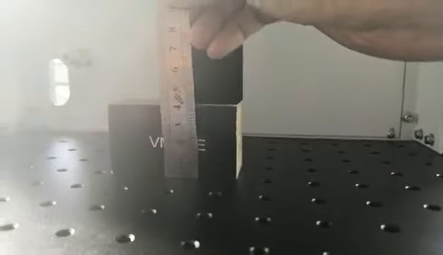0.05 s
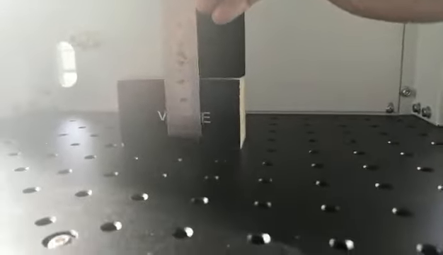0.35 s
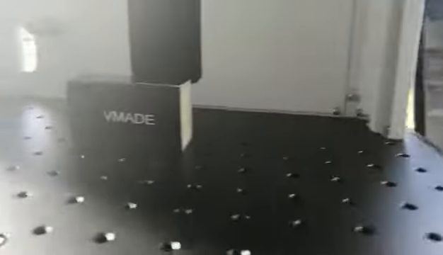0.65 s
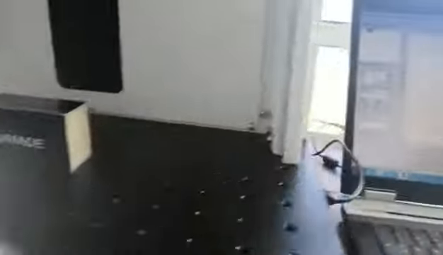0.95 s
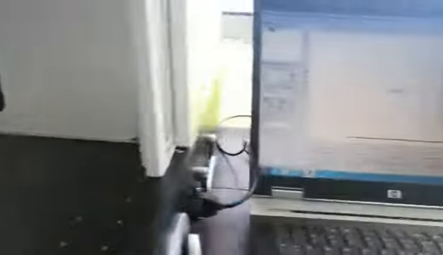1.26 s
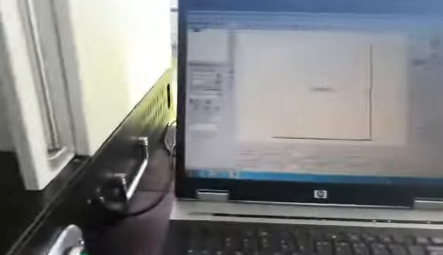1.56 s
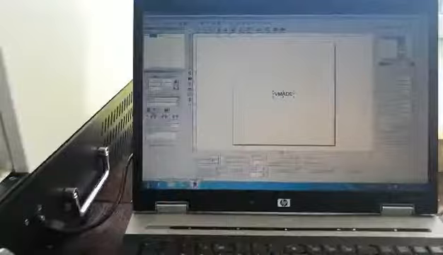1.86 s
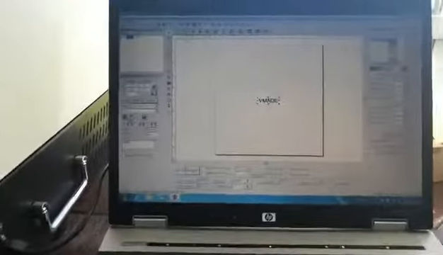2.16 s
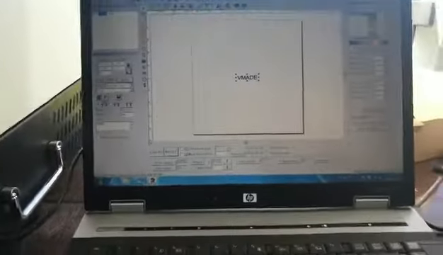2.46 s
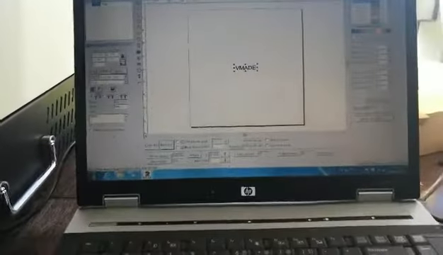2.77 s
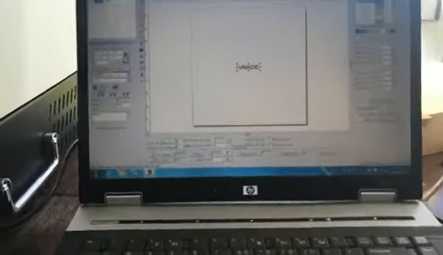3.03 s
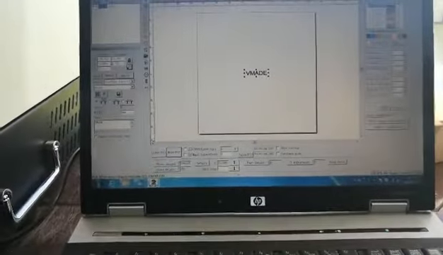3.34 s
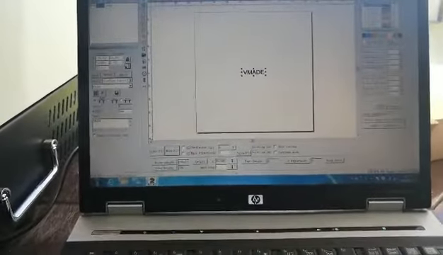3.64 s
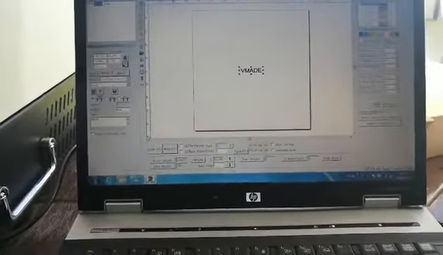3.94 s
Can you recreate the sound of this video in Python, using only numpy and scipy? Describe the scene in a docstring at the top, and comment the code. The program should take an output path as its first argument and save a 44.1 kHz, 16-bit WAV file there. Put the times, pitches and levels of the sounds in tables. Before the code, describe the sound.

A steel ruler and a block clack and scrape on a metal worktable, close by in a small workshop. Two light slides lead to a few sharp knocks, leaving only soft fan hiss and low machine hum.

```python
"""Ruler and block on a metal worktable

A steel ruler and a block are slid and knocked about in a small workshop. Friction makes two scrapes;
impacts excite the modes of table, ruler and block, and two dull knocks and some bright clacks ring
into the room. A fan hisses and a machine cabinet hums, less as the microphone turns away from it."""
import sys
import numpy as np
from scipy import signal
from scipy.fft import rfft, irfft
from scipy.io import wavfile
from scipy.ndimage import uniform_filter1d

SR = 44100
rng = np.random.default_rng(int(sys.argv[2]) if len(sys.argv) > 2 else 0)


def to_wav(sig):
    """Store sig (one row per channel, or 1-D mono) as 16-bit WAV at the path in sys.argv[1].

    Samples outside -1..1 are clipped; the rate is SR.
    """
    pcm = np.clip(np.atleast_2d(sig), -1, 1) * 32767
    pcm = np.round(pcm).astype(np.int16)
    wavfile.write(sys.argv[1], SR, pcm.T)  # frames by channels


N = 176400
T = np.arange(N) / SR
TURN_S = (0.91, 1.97)  # start and end of the microphone's turn away from the cabinet

# modes of the block: f/Hz, level/dB, T60/s
BLOCK_MODES = [(1071, -10, .22), (1416, -10, .24), (1562, -7, .4), (1735, -1, .24), (1764, -1, .35),
               (1827, -3, .22), (2083, -8, .24), (2226, -2, .2), (2266, -3, .28), (2338, -2, .24),
               (2558, -7, .3), (2880, -2, .12), (3015, -7, .17)]
# coherence between the channels for hiss and friction: f/Hz, correlation
COHERENCE = [(240, 0.54), (490, -0.82), (990, 0.43), (2000, -0.028), (6000, -0.014)]


def impacts():
    """Direct and reverberant sound: each blow is heard close by, and the table's crack excites the room."""
    # blows: t/s, level/dB, attack/s, T60/s, left-right/dB, room/dB, ruler/dB, block/dB,
    # then the crack's gain/dB in each of six bands
    blows = [(0.4341, -35.5, 0.001, 0.05, 6, 2.5, -27, -12, 7, 4.5, 2, -9, -10, -16),
             (0.4682, -21.5, 0.0047, 0.024, 4.5, 1, -20, -22, -1, -14.5, 0, -2.5, -1.5, 5),
             (0.4769, -27.5, 0.00092, 0.091, 6.5, -4, -8, -10, 10, 2, 1.5, 0.5, 3, -10),
             (0.4849, -30.5, 0.001, 0.05, 6, -1.5, -8, -16, 8, -2.5, 8, 4.5, 6.5, -9.5),
             (1.1017, -21.5, 0.00075, 0.022, 0.5, -9, -28, -6.5, -8.5, 3.5, 1, -11.5, -6, -1),
             (1.1643, -9.5, 0.001, 0.018, -1.5, -8.5, -30, -12.5, -3, -4.5, 4, -10.5, -2.5, -10),
             (1.3340, -11, 0.0016, 0.026, 1.5, -5.5, -22, -10.5, -10, -3.5, 1.5, -2.5, -4.5, 12.5),
             (1.3740, -21, 0.00055, 0.022, 4.5, 2, 1, -8, -0.5, -5, 2, 2, 4, 1.5),
             (1.3795, -25, 0.0005, 0.024, 2, -4, 7, -4, 0, -4, 2, 4, -1, -5) ]
    direct, echo = np.zeros((2, 2, N))
    for start, db, attack_s, t60, left_db, room_db, ruler_db, block_db, *bands_db in blows:
        crack = table_crack(attack_s, t60, bands_db)
        ring = ruler_and_block(attack_s, ruler_db, block_db)
        add(direct, start, amp(db) * (crack + ring) * pan(left_db))
        add(echo, start, amp(db + room_db) * reverberation(crack))
    return direct, echo


def table_crack(attack_s, t60, bands_db, contact_s=.0012):
    """Modal overlap: the table's dense, quickly damped modes merge into a burst of shaped noise."""
    # response of the table to any blow: f/Hz, level/dB
    response = [(60, -35.5), (200, -35.5), (450, -7.5), (750, -1), (1100, 6), (1400, 0.5), (1750, 3.5),
                (2800, 2.5), (3200, 2.5), (3700, 5.5), (4400, -2), (5300, 1), (7200, 1.5), (7700, -9),
                (8300, -23), (8800, -36)]
    # centres of the six bands: f/Hz
    band_hz = [550, 1120, 2150, 3430, 6050, 7100]
    t, f = np.arange(SR // 2) / SR, np.fft.rfftfreq(2048, 1 / SR)
    rise = np.minimum(t / attack_s, 1)
    envelope = rise * amp(-60 * np.maximum(t - attack_s - contact_s, 0) / t60)
    grain = rng.standard_normal((2, len(t)))
    spectrum = rfft((grain + 0.16 * grain[::-1]) * envelope)  # the channels share a little noise
    local_rms = np.sqrt(uniform_filter1d(abs(spectrum) ** 2, size=400, axis=1))
    white_burst = irfft(spectrum / local_rms, len(t)) * np.linalg.norm(envelope)
    gain_db = curve(response, f) + curve(list(zip(band_hz, bands_db)), f)
    return amp(3) * minimum_phase(white_burst * (t < t[-1] / 2), gain_db)[:, :len(t)]


def ruler_and_block(attack_s, ruler_db, block_db):
    """Free vibration: the struck ruler and block ring on at their natural frequencies."""
    # modes of the steel ruler: f/Hz, level/dB, T60/s
    ruler_modes = [(3416, 0, .07), (3582, 2, .06), (3655, 1, .055), (3723, 1, .06), (3887, 1, .08),
                   (4032, 2, .085), (4108, -6, .12), (6780, -12, .27), (6979, -12, .26), (7111, -14, .25),
                   (7396, -14, .25)]
    t = np.arange(SR // 2) / SR
    ring = amp(ruler_db) * ringing(ruler_modes, t) + amp(block_db) * ringing(BLOCK_MODES, t)
    return amp(-7) * ring * np.minimum(t / attack_s, 1)


def ringing(modes, t):
    """Modal superposition: damped sines add, each with a random phase in each channel."""
    return sum(amp(db - 60 * t / t60) * np.sin(2 * np.pi * (hz * t + rng.random((2, 1))))
               for hz, db, t60 in modes)


def scrapes(dull_db=-17):
    """Friction drives the block's modes and a table rumble; the sound swells and brightens with speed."""
    # slides: start t/s, fastest t/s, end t/s, level/dB, left-right/dB, treble/dB, body/dB
    slides = [(-.2, 0.092, 0.42, -40.5, 1.5, 5, 3), (.46, 0.63, 1.04, -31.7, 2.5, 1, -3.5)]
    # spectrum of the friction: f/Hz, density level/dB
    friction_spectrum = [(240, -41.5), (400, -1.5), (447, -8), (630, -3), (888, -10), (1020, 0), (1400, -4),
                         (1810, 1), (2640, -1), (3820, -7), (4270, -9), (6720, -15), (7500, -24),
                         (9750, -48), (16500, -120)]
    # spectrum of the table's rumble: f/Hz, density level/dB
    rumble_spectrum = [(20, -17), (45, 1), (75, -7), (110, -1.5), (140, -9), (300, -25.5), (800, -63.5)]
    mix = np.zeros((2, N))
    for start, fastest, end, db, left_db, treble_db, body_db in slides:
        speed = np.sin(np.pi * np.interp(T, [start, fastest, end], [0, .5, 1])).clip(1e-4)
        rub = moving_contact(noise(friction_spectrum, COHERENCE))
        rub *= amp(2 * drift(hz=250))  # graininess
        ring = signal.fftconvolve(rub, ringing(BLOCK_MODES, T[:SR // 4]), axes=1)[:, :N]
        rub += amp(-13) * unit_rms(ring)
        body = signal.sosfiltfilt(signal.butter(3, 850, fs=SR, output="sos"), rub)
        treble = signal.sosfiltfilt(signal.butter(3, 4000, "high", fs=SR, output="sos"), rub)
        rub += body * (amp(body_db) - 1)
        rub += treble * (amp(treble_db + dull_db * (1 - speed)) - 1)
        rumble = noise(rumble_spectrum, [(60, 1.0), (300, 0.92)]) * amp(-49.5 + body_db)
        mix += (rub * amp(db) * pan(left_db) + rumble) * speed ** 1.8
    return mix


def moving_contact(rub, depth_db=4):
    """Excitation depends on position: narrow resonances come and go as the point of contact travels."""
    spectra = signal.stft(rub, nperseg=2048, noverlap=1536)[2]
    patches = uniform_filter1d(rng.standard_normal(spectra.shape[1:]), size=4, axis=0)
    patches = unit_rms(uniform_filter1d(patches, size=10, axis=1))
    shifted = signal.istft(spectra * amp(depth_db * patches), nperseg=2048, noverlap=1536)[1]
    return unit_rms(shifted[:, :N])


def reverberation(x, build_s=.012):
    """Diffuse field: dense reflections build up quickly, then each band decays at its own rate."""
    # reverberation time of the workshop: f/Hz, T60/s
    decay = [(200, 0.04), (1000, 0.42), (2200, 0.49), (4000, 0.53), (6500, .5)]
    # spectrum of the reflections: f/Hz, level/dB
    tone = [(200, -9.5), (1000, 4), (1750, 3.5), (2250, 0), (2800, 2), (3600, -4), (4500, 3.5), (5800, 4.5),
            (7200, -4)]
    hz, t, spectra = signal.stft(rng.standard_normal((2, SR)), SR, nperseg=256)
    spectra *= amp(curve(tone, hz)[:, None] - 60 * t / curve(decay, hz)[:, None])
    tail = signal.istft(spectra, SR, nperseg=256)[1]
    tail *= np.minimum(np.arange(tail.shape[1]) / SR / build_s, 1)
    return signal.fftconvolve(x, tail / np.linalg.norm(tail[0]), axes=1)


def cabinet(throb_hz=6.2, waver_hz=3.2, wander_hz=1.3):
    """Forced vibration: wavering motor tones over a throbbing rumble, weaker as the microphone turns."""
    # spectrum of the cabinet's rumble: f/Hz, density level/dB
    rumble_spectrum = [(20, -25), (32, -18.5), (46, -10), (75, -18.5), (100, -9), (130, -12.5), (148, -2),
                       (160, 1), (186, -2), (230, -7.5), (295, -10.5), (322, -14), (400, -19), (600, -19),
                       (1200, -57)]
    # motor tones: f/Hz, level/dB before the turn, level/dB after it, depth of waver
    motor_tones = [(160.7, -52, -56, 0.45), (208.7, -41.5, -56, 0.21), (259.3, -46, -60.5, 0.47),
                   (347.3, -55, -60.5, .55)]
    rumble = noise(rumble_spectrum, [(60, 1.0), (160, 0.94), (280, 0.42), (490, 0)])
    rumble *= amp(np.interp(T, TURN_S, [-39.5, -47.5]) + 1.7 * drift(throb_hz))
    hum = np.zeros(N)
    for hz, facing_db, away_db, waver in motor_tones:
        cycles = np.cumsum(hz + wander_hz * drift(waver_hz)) / SR
        modulation = 1 + waver * (drift(waver_hz) + 1j * drift(waver_hz))  # of amplitude and phase
        amplitude = np.sqrt(2) * amp(np.interp(T, TURN_S, [facing_db, away_db]))
        hum += amplitude * (modulation * np.exp(2j * np.pi * cycles)).real
    dip_db = -5 * np.exp(-((T - .45) / .12) ** 2)  # the level dips briefly
    return (rumble + hum) * amp(dip_db)


def fan():
    """Broadband flow noise: an airy hiss, a little louder before the microphone turns."""
    # spectrum of the fan: f/Hz, density level/dB
    hiss_spectrum = [(200, -25), (380, -3), (550, -3), (760, -2), (900, -2), (1350, -3), (1790, -1),
                     (2300, -4.5), (2800, -4), (3250, -10.5), (4200, -13.5), (4750, -12.5), (5600, -15.5),
                     (7500, -18)]
    hiss = noise(hiss_spectrum, COHERENCE, ripple_db=1.4)
    return hiss * amp(np.interp(T, TURN_S, [-44, -48.5]) + .4 * drift(hz=18))


def lean_left(x, share):
    """Level difference at constant power: most of the treble is stronger in the left channel."""
    # channel balance: f/Hz, left-right/dB
    balance = [(310, -0.5), (530, 3), (920, 4), (1590, -1), (2740, 3.5), (4720, 7.5), (7400, 13.5),
               (8100, -10)]
    ratio = amp(share * curve(balance, np.fft.rfftfreq(N, 1 / SR)))
    gains = np.array([ratio, np.ones_like(ratio)]) * np.sqrt(2 / (1 + ratio ** 2))
    return irfft(rfft(x) * gains, N)


def noise(spectrum, coherence, ripple_db=0):
    """Partly coherent stereo noise from (f/Hz, level/dB) and (f/Hz, correlation), with spectral ripple."""
    f = np.fft.rfftfreq(N, 1 / SR)
    left, independent = rfft(rng.standard_normal((2, N)))
    correlation = np.clip(curve(coherence, f), -1, 1)
    right = correlation * left + np.sqrt(1 - correlation ** 2) * independent
    ripple = unit_rms(uniform_filter1d(rng.standard_normal((2, len(f))), size=240, axis=1))
    gain = amp(curve(spectrum, f) + ripple_db * ripple)
    return unit_rms(irfft(np.array([left, right]) * gain, N))


def drift(hz):
    """Random fluctuation: low-passed noise of rms 1."""
    f = np.fft.rfftfreq(N, 1 / SR)
    return unit_rms(irfft(rfft(rng.standard_normal(N)) / (1 + (f / hz) ** 4), N))


def minimum_phase(x, gain_db):
    """Causal filter: the phase follows from the log gain by the Hilbert transform."""
    log_gain = np.log(amp(np.r_[gain_db, gain_db[-2:0:-1]]))
    taps = np.fft.ifft(np.exp(np.conj(signal.hilbert(log_gain)))).real
    return signal.fftconvolve(x, taps[None, :len(gain_db)], axes=1)


def lowpass(x, hz):
    """Steep band limit by a windowed sinc."""
    return signal.oaconvolve(x, signal.firwin(801, hz, window=("kaiser", 8), fs=SR)[None], "same")


def amp(db):
    """Level to amplitude ratio."""
    return 10 ** (np.asarray(db) / 20)


def unit_rms(x):
    """Normalisation to rms 1."""
    return x / np.sqrt(np.mean(x ** 2) + 1e-20)


def curve(points, hz):
    """Interpolation on a log-frequency axis."""
    f, value = np.transpose(points)
    return np.interp(np.log(hz + 1), np.log(f + 1), value)


def pan(left_db):
    """Left and right gains for a level difference."""
    return amp(np.array([[left_db], [-left_db]]) / 2)


def add(mix, start_s, sound):
    """Superposition of a sound from a given time."""
    part = mix[:, round(start_s * SR):][:, :sound.shape[1]]
    part += sound[:, :part.shape[1]]


def scene():
    """The sources superpose; direct blows lean less to the left and reach higher than sustained sound."""
    direct, echo = impacts()
    sustained = echo + scrapes() + fan() + cabinet()
    return lean_left(direct, share=.25) + lowpass(lean_left(sustained, share=1), hz=7580)


def record(dry, ceiling=.85):
    """Soft saturation rounds the highest peaks; a band limit follows."""
    rounded = dry / (1 + (dry / ceiling) ** 4) ** .25
    return lowpass(rounded, hz=8750)


dry = scene()
out = record(dry)
to_wav(out)
```